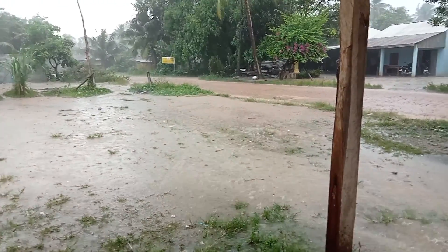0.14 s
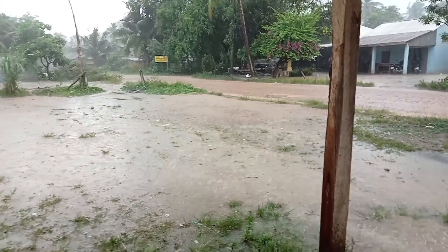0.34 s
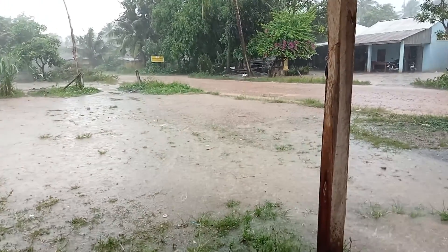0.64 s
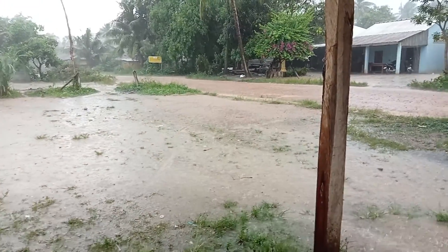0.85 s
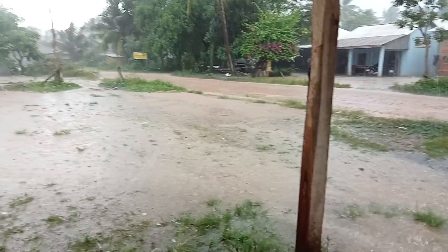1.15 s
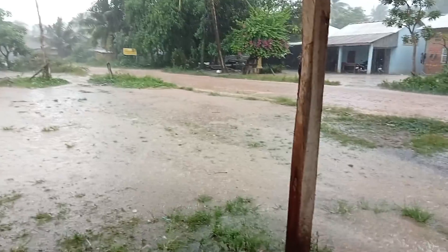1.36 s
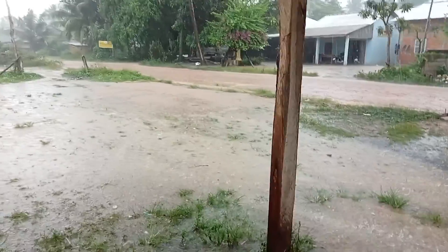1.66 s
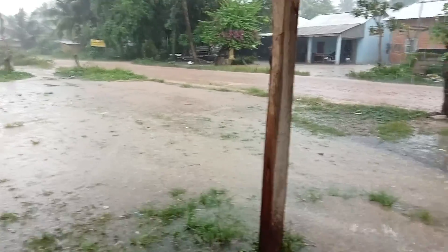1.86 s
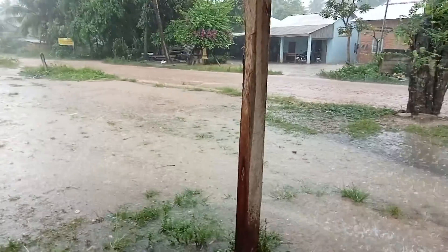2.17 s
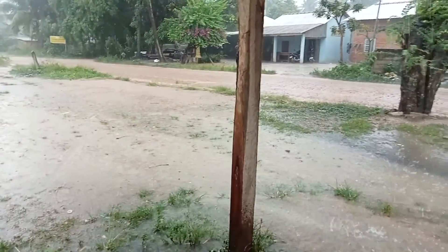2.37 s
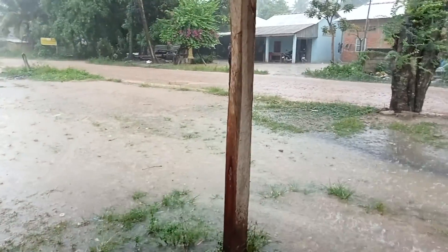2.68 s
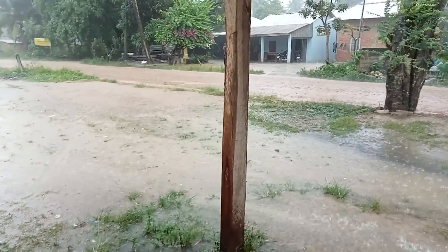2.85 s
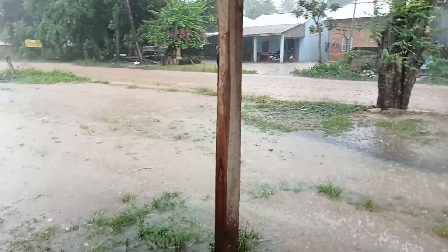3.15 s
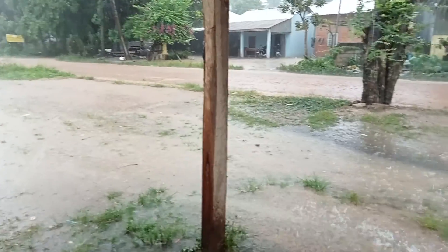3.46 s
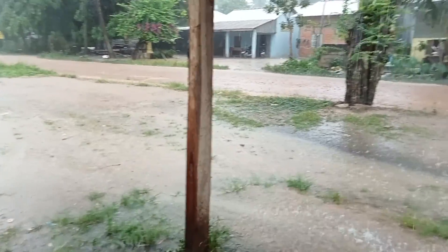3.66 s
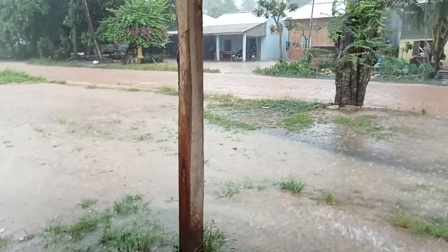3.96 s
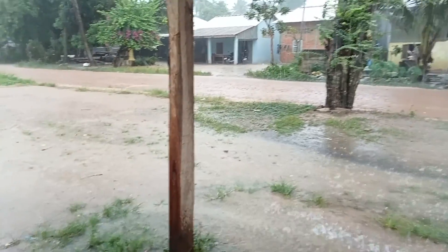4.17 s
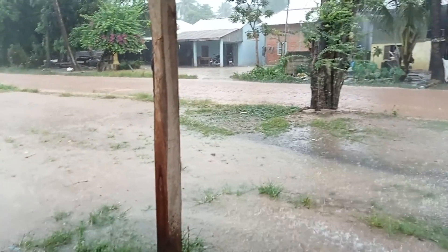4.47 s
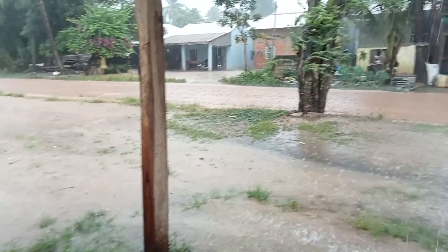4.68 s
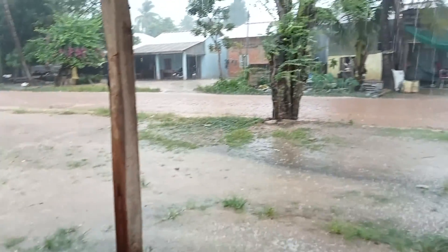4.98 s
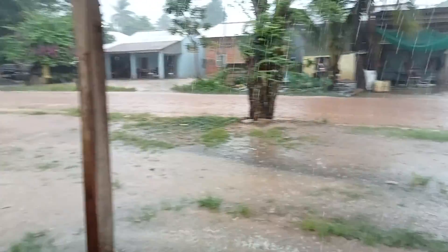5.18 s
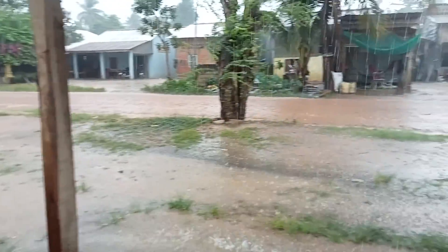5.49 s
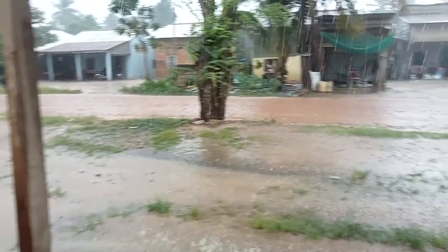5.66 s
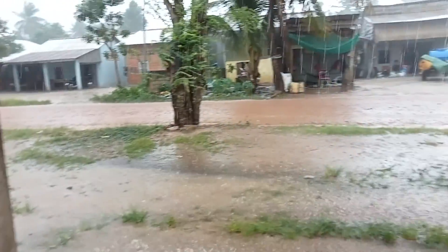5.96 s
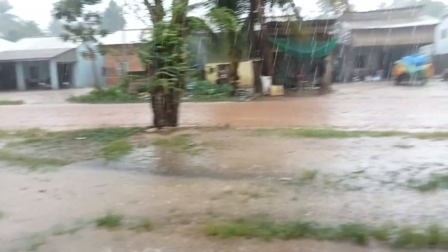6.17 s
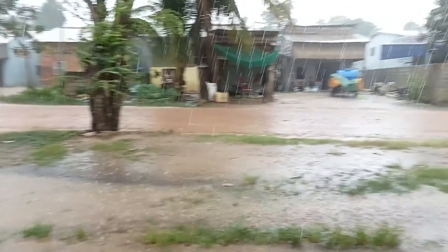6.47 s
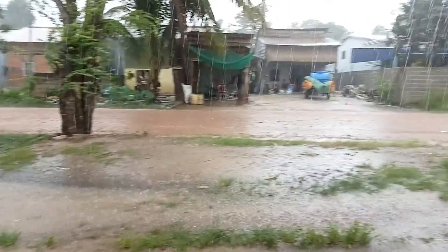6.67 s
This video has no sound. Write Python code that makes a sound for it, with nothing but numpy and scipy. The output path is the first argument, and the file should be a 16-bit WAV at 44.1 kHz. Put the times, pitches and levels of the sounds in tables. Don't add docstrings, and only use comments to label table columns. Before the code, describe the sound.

A downpour fills everything from the start, a noisy metallic wash with splattering drops, swelling slightly between one and two seconds as low thunder tumbles far off. The thunder fades by three seconds, leaving rain and sharp little splashes off the eaves, then very faint mutters near the end. Close, nearly mono handheld microphone, outdoors under sheet roofing, with a crisp fizzy edge.

```python
import sys
import numpy as np
from scipy import signal
from scipy.fft import rfft, irfft, next_fast_len
from scipy.io import wavfile

SR = 44100
rng = np.random.default_rng(int(sys.argv[2]) if len(sys.argv) > 2 else 0)


def amp(db):
    return 10 ** (np.asarray(db, float) / 20)


def write(x):
    x = np.atleast_2d(x).T
    wavfile.write(sys.argv[1], SR, np.round(np.clip(x, -1, 1) * 32767).astype(np.int16))


N = 301203
FFT_SIZE = next_fast_len(N + SR)
BINS_HZ = np.maximum(np.fft.rfftfreq(FFT_SIZE, 1 / SR), 1)

# time in seconds, level in dB.
RAIN = [(0.0, -22.5), (0.55, -21), (1.0, -20), (1.26, -20.5), (1.45, -19), (1.62, -19.5), (1.92, -19),
        (2.3, -20.5), (2.75, -21), (3.3, -22.5), (3.85, -22.5), (4.0, -21), (4.15, -22), (4.65, -21),
        (5.3, -22.5), (6.0, -23), (6.52, -24.5), (6.83, -23)]
# frequency in Hz, spectral level in dB per Hz.
SHEET = [(40, -35), (85, -32), (130, -18), (165, -10.5), (460, -11), (600, -8.5), (800, -11), (1100, -6.5),
         (1650, -3), (2200, -2), (3000, -3), (3700, -5), (5100, -4), (16000, -8)]
# frequency in Hz, gain in dB.
PORT = [(5100, 0), (5800, 1.5), (6550, 7), (6950, 5), (7500, -1), (8200, -7.5), (8800, -11.5), (9600, -12),
        (10700, -12.5), (11700, -9.5), (12750, -6), (13500, -8.5), (14600, -9.5), (15500, -14)]


def rms_one(x):
    return x / np.sqrt(np.mean(x ** 2) + 1e-20)


def in_time(rows):
    s, db = np.transpose(rows)
    return np.interp(np.arange(N) / SR, s, db)


def filtered(x, gain):
    return irfft(rfft(x, FFT_SIZE) * gain, FFT_SIZE)[:N]


def coloured(x, points):
    hz, db = np.transpose(points)
    return filtered(x, amp(np.interp(np.log(BINS_HZ), np.log(hz), db)))


def highpassed(x, hz):
    return signal.sosfilt(signal.butter(2, hz, "high", fs=SR, output="sos"), x)


def drift(rate):
    r = np.exp(-40 * np.pi * rate / SR)
    slow = signal.lfilter([1], [1, -2 * r, r * r], rng.standard_normal(N // 20 + 2002))[2000:]
    return np.interp(np.arange(N) / 20, np.arange(len(slow)), rms_one(slow))


def thunder_bed():
    # frequency in Hz, spectral level in dB per Hz.
    roll_colour = [(22, -36), (45, -13), (70, 3), (110, 4), (150, -0.5), (220, -4.5), (300, -2), (420, -14),
                   (600, -38)]
    return rms_one(coloured(rng.standard_normal(N), roll_colour))


def rolling(bed):
    # time in seconds, level in dB.
    roll = [(0.0, -45), (0.36, -39), (0.6, -35), (1.2, -33.5), (1.55, -31), (1.8, -39), (2.5, -39.5),
            (2.95, -40.5), (3.3, -62), (4.5, -60), (5.3, -53), (5.9, -53), (6.2, -56), (6.83, -60)]
    churn_db, churn_per_s = 2, 38
    return amp(in_time(roll) + churn_db * drift(churn_per_s)) * bed


def mutters(bed):
    # centre in seconds, peak level in dB.
    mutter_swells = [(0.04, -46), (0.52, -40), (2.235, -34.5), (2.42, -38), (2.57, -47), (2.78, -42),
                     (3.1, -53), (3.72, -60), (3.91, -52), (4.15, -50), (5.01, -48), (5.5, -50),
                     (5.65, -41), (5.73, -48), (5.92, -44), (6.35, -44), (6.6, -49), (6.72, -49)]
    length_ms = 57
    marks = np.zeros(N)
    for s, db in mutter_swells:
        marks[round(s * SR)] = amp(db)
    t = np.arange(-4000, 4001) / SR
    swell = np.exp(-.5 * (t * 2355 / length_ms) ** 2)
    return signal.fftconvolve(marks, swell, "same") * bed


def lumps(bed):
    # centre in seconds, peak level in dB, pitch in Hz, half-height length in ms.
    thunder_lumps = [(0.319, -37, 164, 47), (0.423, -19, 140, 12), (0.444, -19, 163, 11),
                     (0.585, -17, 135, 23), (0.625, -24, 149, 24), (0.706, -11.5, 178, 6.6),
                     (0.777, -20, 152, 15), (0.88, -27, 150, 54), (0.933, -27, 149, 29),
                     (1.085, -21.5, 154, 39), (1.251, -19.5, 175, 34), (1.309, -20, 137, 32),
                     (1.367, -19, 192, 27), (1.406, -15, 148, 23), (1.437, -21, 125, 17),
                     (1.476, -12, 216, 15), (1.512, -13.5, 176, 49), (1.553, -16, 120, 35),
                     (1.585, -7, 171, 17), (1.641, -21, 213, 8.1), (1.678, -15, 193, 10),
                     (1.698, -14, 206, 10), (1.731, -13, 211, 21), (1.874, -22, 121, 16),
                     (1.965, -18, 126, 33), (2.099, -26, 152, 64), (2.303, -22, 149, 12),
                     (2.336, -21.5, 190, 22), (2.646, -18, 172, 8.9), (2.973, -23.5, 158, 13)]
    lift_db, lift_ms = -17, 18
    rasp_colour = [(130, -26), (210, 5.5), (300, -3.0), (480, -7.5), (700, -31)]   # (Hz, dB per Hz)
    rasp = rms_one(coloured(rng.standard_normal(N), rasp_colour))
    half = 1700
    t = np.arange(-half, half) / SR
    out = np.zeros(N)
    for s, db, hz, ms in thunder_lumps:
        start, glide, mix = rng.random(3)
        centre = round(s * SR)
        span = slice(centre - half, centre + half)
        width = ms / 2355
        swell = np.exp(-.5 * (t / width) ** 2)
        bend = 1 + 0.19 * (glide - .5) * t / width
        turn = 2 * np.pi * (0.9 * hz * t * bend + start)
        wave = np.cos(turn) + 0.092 * np.cos(0.69 * turn + 2 * np.pi * mix)
        lift = np.exp(-.5 * (t * 2355 / (ms + lift_ms)) ** 2) * np.hanning(len(t))
        out[span] += amp(db - 2.5) * swell * (wave + 0.4 * rasp[span])
        out[span] += amp(db + lift_db) * lift * bed[span]
    return out


def thunder():
    bed = thunder_bed()
    return rolling(bed) + mutters(bed) + lumps(bed)


def impacts(per_s, spread_db):
    sizes = amp(spread_db * np.minimum(rng.exponential(1, N), 5)) * rng.choice([-1, 1], N)
    return sizes * (rng.random(N) < per_s / SR) + 1e-18


def plinks(count, t60_s, rise, spread_db):
    when, pitch, size, climb = rng.random((count, 4)).T
    hz = (600 + 14500 * pitch[:, None] ** 2.2).astype(np.float32)
    climb = climb.astype(np.float32)[:, None]
    t = np.arange(1024, dtype=np.float32) / SR
    age = t / (t60_s * (1000 / hz) ** 0.062)
    rings = np.sin(2 * np.pi * hz * t * (1 + rise * climb ** 4 * age * 1000 / hz))
    rings *= amp(-60 * age) * np.minimum(t / 0.004, 1) * np.hanning(2048)[1024:]
    rings *= amp(-spread_db * np.log(size + 0.036))[:, None]
    at = (when * N).astype(int)[:, None] + np.arange(1024)
    return np.bincount(at.ravel(), rings.ravel(), N + 1024)[:N]


def splashes():
    # start in seconds, peak level in dB.
    eaves_splashes = [(1.3179, -22), (1.4207, -8), (1.9126, -9), (2.5735, -18), (3.928, -7), (4.1869, -21),
                      (4.2527, -21), (4.3111, -20), (4.5166, -15), (4.6743, -16), (4.8695, -5),
                      (4.9357, -11), (5.233, -9), (5.2944, -21)]
    bursts = np.zeros(N)
    for s, db in eaves_splashes:
        bursts[round(s * SR)] = amp(db + 13.5)
    fading = signal.lfilter([1], [1, -amp(-60 / (.06 * SR))], bursts)
    return fading * highpassed(rng.standard_normal(N), 7000)


def ridged(x):
    # frequency in Hz, width in Hz, lift in dB.
    sheet_ridges = [
        (1680, 146, 1.25),
        (2300, 133, 1.2),
        (1890, 81, -0.7),
    ]
    db = np.zeros(len(BINS_HZ))
    for hz, width_hz, top_db in sheet_ridges:
        db += top_db * np.exp(-.5 * ((BINS_HZ - hz) / width_hz) ** 2)
    return filtered(x, amp(db))


def patchy(x, own_db, shared_db, bright_db):
    spectrum, out = rfft(x, FFT_SIZE), np.zeros(N)
    octave = np.log2(np.maximum(BINS_HZ, 100))
    centres = np.log2(100) + np.arange(0, 23) / 3
    treble, neighbour = drift(13.0) + 0.69 * drift(45), drift(10)
    for centre in centres:
        share = np.clip(1 - 3 * np.abs(np.minimum(octave, centres[-1]) - centre), 0, 1)
        neighbour = 0.74 * neighbour + 0.19 * drift(5.1)
        brightness = np.clip((centre - np.log2(1800)) / 2.7, 0, 1)
        db = own_db * drift(8) + shared_db * neighbour + bright_db * brightness * treble
        out += amp(db) * irfft(spectrum * share, FFT_SIZE)[:N]
    return out


def gusting(heard):
    spray_follows, fizz_follows = .3, 0.37
    spray_wander_db, fizz_wander_db, wander_per_s = 0.15, 0.54, 5.4
    drum_db = in_time(RAIN)
    sway = drift(wander_per_s)
    spray_db = spray_follows * drum_db + spray_wander_db * sway
    fizz_db = fizz_follows * drum_db + fizz_wander_db * (0.32 * sway + 0.65 * drift(wander_per_s))
    body = coloured(heard, [(4800, 0), (5600, -60)])
    fizz = coloured(heard, [(8000, -60), (9200, 0)])
    spray = heard - body - fizz
    gust = body + amp(spray_db - spray_db.mean()) * spray + amp(fizz_db - fizz_db.mean()) * fizz
    return amp(drum_db + .5) * gust / np.std(body)


def rain():
    roar = rng.standard_normal(N)
    crackle = amp(-15.5) * highpassed(rms_one(impacts(2500, spread_db=3.0)), 6000)
    puddles = amp(-16.0) * plinks(count=6500, t60_s=0.41, rise=0.82, spread_db=1.5)
    drops = coloured(roar + crackle + splashes() + puddles, SHEET)
    flickering = patchy(ridged(drops), own_db=.5, shared_db=1.4, bright_db=0.82)
    return gusting(coloured(flickering, PORT))


def scene():
    return np.tile(thunder() + rain(), (2, 1))


def side_patches():
    # time in seconds, low edge in Hz, high edge in Hz.
    wide_moments = [(0.112, 13740, 15500), (0.135, 13740, 15160), (0.135, 7540, 9690), (1.135, 6900, 8270),
                    (1.622, 4610, 5680), (1.622, 7540, 8960), (1.693, 8230, 10380), (1.693, 4650, 5680),
                    (2.482, 5240, 8270), (2.505, 4200, 5270), (2.739, 10340, 11760), (3.435, 8910, 10340),
                    (3.644, 11670, 13140), (4.062, 13050, 15160), (4.177, 9690, 11070), (4.177, 5120, 6290),
                    (4.177, 6890, 8960), (4.177, 13050, 14470), (4.572, 4610, 5680), (5.384, 6240, 7620),
                    (5.384, 11020, 12450), (6.104, 8270, 9690), (6.104, 5150, 6850), (6.243, 11670, 13090),
                    (6.406, 8300, 9650), (6.429, 8300, 9650), (6.591, 11020, 12400)]
    patch_db = -20
    hop, first = 1024, 909
    drum_db, out = in_time(RAIN), np.zeros(N)
    line, t = np.arange(hop) + .5, np.arange(2 * hop) + 512.5
    hz = line * SR / 2048
    window = np.sin(np.pi * (np.arange(2 * hop) + .5) / 2048)
    colour = amp(np.interp(hz, *np.transpose(PORT)) + np.interp(hz, *np.transpose(SHEET)))
    for s, low_hz, high_hz in wide_moments:
        used = (hz > low_hz) & (hz < high_hz)
        sizes = (rng.standard_normal(hop) * colour)[used]
        at = first + hop * (round((s * SR - first) / hop) - 1)
        noise = sizes @ np.cos(np.pi / hop * np.outer(line[used], t))
        out[at:at + 2 * hop] += amp(drum_db[at] + patch_db) * window * noise
    return out


def low_pass(x):
    return signal.sosfilt(signal.butter(12, 15510, fs=SR, output="sos"), x)


def record(dry):
    mix = dry + side_patches() * [[1], [-1]]
    return low_pass(mix)


dry = scene()
out = record(dry)
write(out)
```